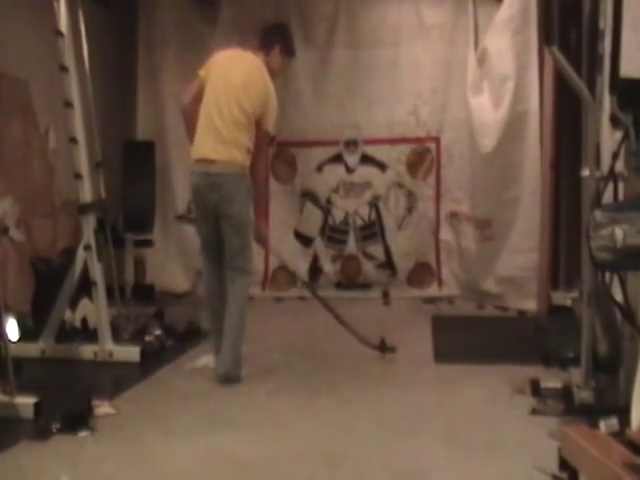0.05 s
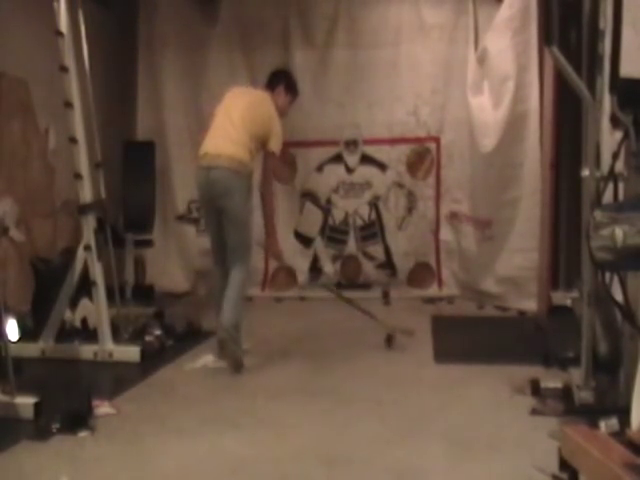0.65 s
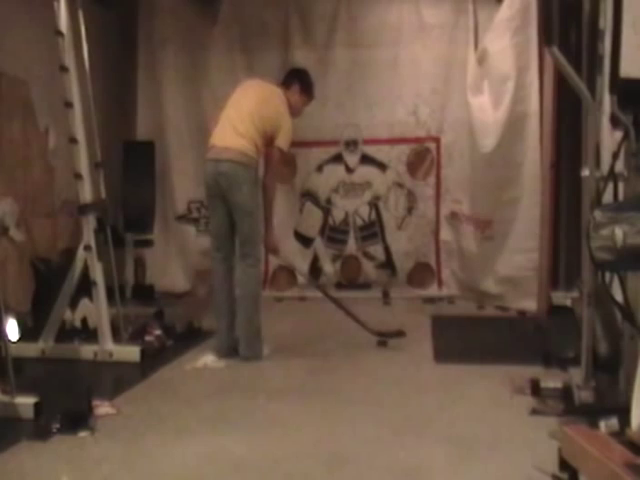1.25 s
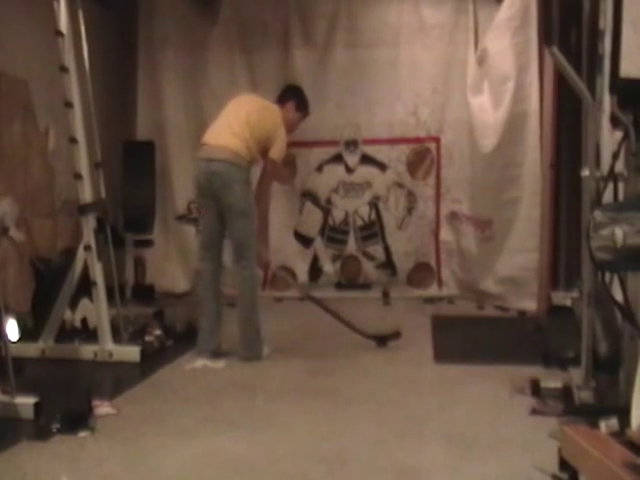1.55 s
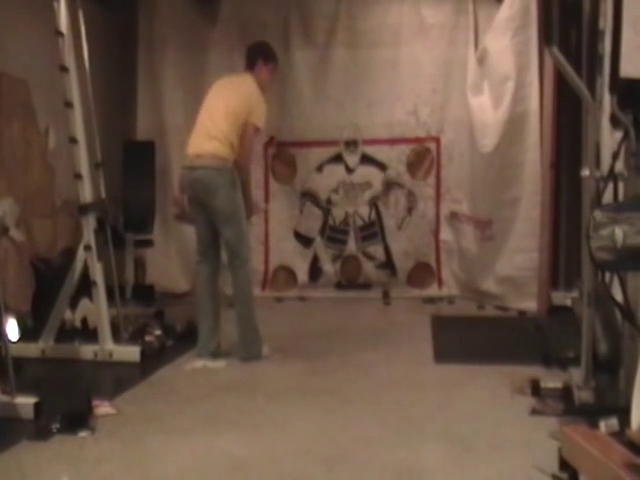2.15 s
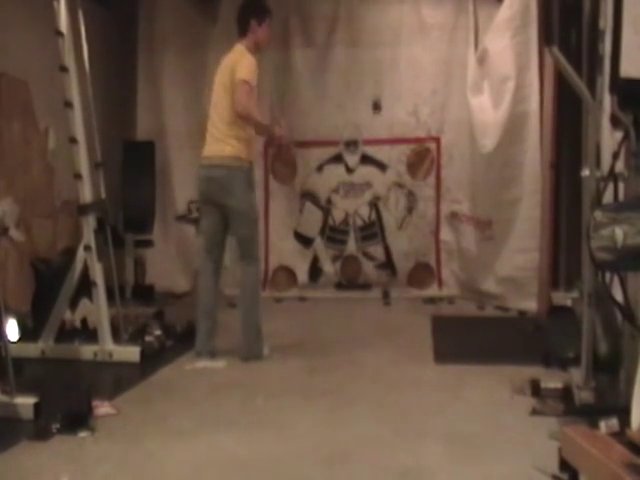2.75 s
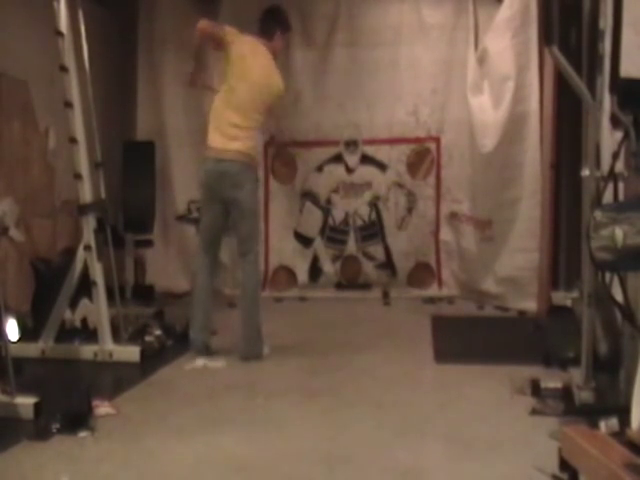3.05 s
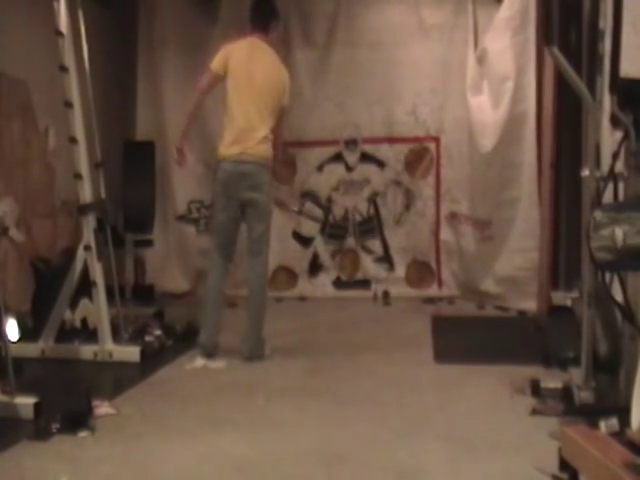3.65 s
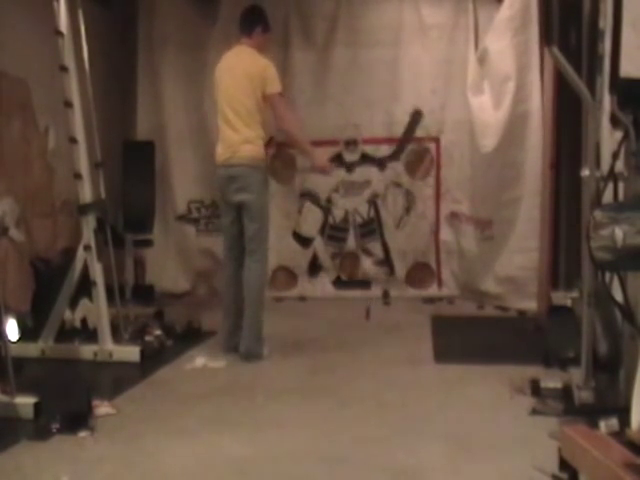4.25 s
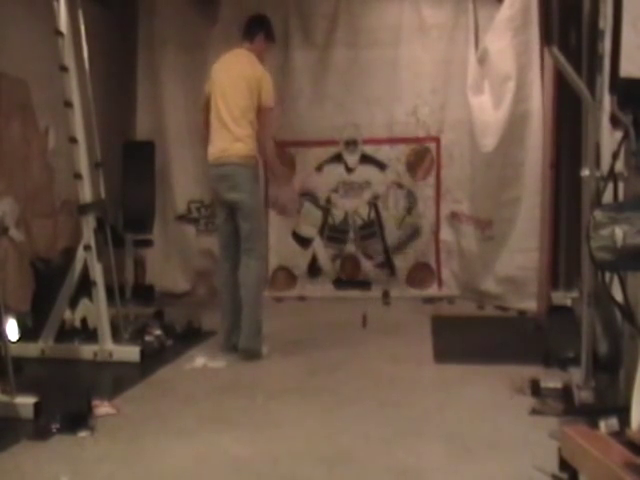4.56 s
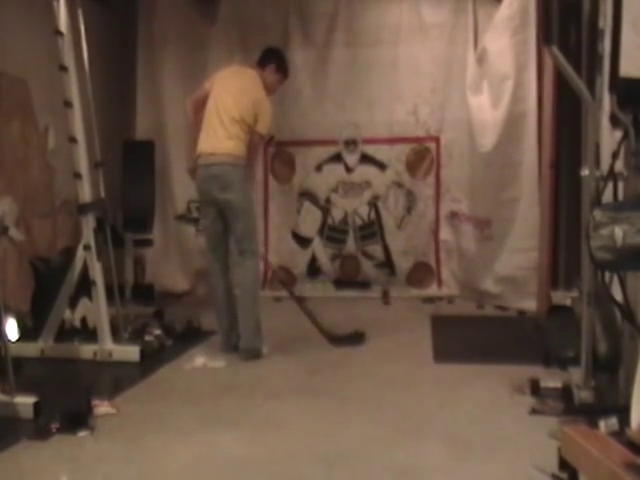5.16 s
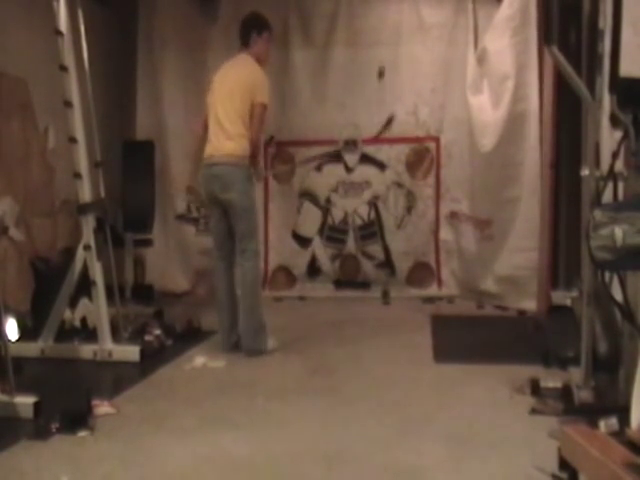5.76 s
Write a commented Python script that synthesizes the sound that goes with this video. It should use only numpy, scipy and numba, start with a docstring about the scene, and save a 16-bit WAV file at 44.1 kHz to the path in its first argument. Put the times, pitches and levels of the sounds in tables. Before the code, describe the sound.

Faint hiss fills a bare basement, with soft swishes of shoes and clothes throughout. From about 0.2 to 0.6 seconds a puck judders and scrapes quietly over gritty concrete. A hockey stick blade clacks on the floor at 0.8 and 1.0 seconds, light thuds follow, and at 1.7 it knocks the puck hard with a short ring. At 3.0 a very loud slap shot cracks. At 3.2 the puck hits a hanging tarp with an equally loud, deep boom; the tarp flaps, and the puck drops and bounces faintly around 3.6. Soft footfalls and a tiny tink come between 4.5 and 4.8. At 5.0 the stick slaps the floor sharply, with lighter taps and dull clacks until 5.3, then quiet shuffling. Each blow echoes for about half a second. The sound is narrow and centered, and the loudest hits slightly overload the microphone.

```python
"""Shoes shuffle over faint hiss and a puck scrapes across concrete: hockey practice in a bare basement.
The stick drags and taps the puck, then fires a slap shot; each blow rings the blade and the room.
The puck booms into a hanging tarp, drops and bounces; soles thud and clothes swish between the blows.
Closely spaced microphones give a narrow image; the loudest cracks clip and turn the gain down."""
import sys
import numpy as np
from scipy import signal
from scipy.fft import rfft, irfft, next_fast_len
from scipy.io import wavfile
from scipy.ndimage import map_coordinates
from numba import njit

SR = 44100
rng = np.random.default_rng(int(sys.argv[2]) if len(sys.argv) > 2 else 0)


def output_pcm(signal):
    """Save a mono or channel-first signal as 16-bit PCM at the path in sys.argv[1].

    Samples are clipped to [-1, 1] before scaling.
    """
    pcm = np.clip(np.atleast_2d(signal).T, -1, 1) * 32767
    wavfile.write(sys.argv[1], SR, np.round(pcm).astype(np.int16))


N = 255780


def amp(db):
    """Decibels to gain."""
    return 10 ** (np.asarray(db) / 20)


def along(points, hz):
    """Interpolate (frequency [Hz], value) points on a log axis."""
    point_hz, values = np.transpose(points)
    return np.interp(np.log(hz + 1), np.log(point_hz + 1), values)


def wobble(knots_per_s):
    """Smooth random curve."""
    knots = rng.standard_normal(int(N * knots_per_s / SR) + 4)
    return map_coordinates(knots, [np.arange(N) * knots_per_s / SR])


def filtered(x, gain_at_hz):
    """Zero-phase filter."""
    size = next_fast_len(N + SR // 2)
    return irfft(rfft(x, size) * gain_at_hz(np.fft.rfftfreq(size, 1 / SR)), size)[..., :N]


def noise(spectrum, grain_db):
    """Mid/side noise of rms 1; grain_db makes single grains stand out."""
    grains = rng.standard_normal((2, N)) * amp(grain_db * rng.standard_normal(N))
    shaped = filtered(grains, lambda hz: amp(along(spectrum, hz)))
    return shaped / np.sqrt(np.mean(shaped ** 2) + 1e-20)


def gesture(peak_s, db, swell_s, fade_s, hold_s=0, sag_db_per_s=0):
    """Gain of a movement: swell, sagging hold, fade. Swell and fade times span 20 dB."""
    t = np.arange(N) / SR - peak_s
    below_db = 20 * (np.maximum(-t, 0) / swell_s + np.maximum(t - hold_s, 0) / fade_s)
    return amp(db - below_db - sag_db_per_s * np.clip(t, 0, hold_s))


def body_impulse(level_db):
    """Causal, unit-energy impulse response of a body with this spectrum."""
    cepstrum = irfft(np.log(amp(level_db)))
    half = len(cepstrum) // 2
    one_sample_delay = np.exp(-1j * np.pi * np.arange(half + 1) / half)
    ring = irfft(np.exp(rfft(2 * cepstrum[1:half], 2 * half) * one_sample_delay))
    return ring[:half] / np.linalg.norm(ring)


# reverberation: (frequency [Hz], T60 [s])
BASEMENT_T60 = [(80, 0.74), (250, 0.44), (600, 0.51), (1500, 0.54), (4000, 0.55), (8000, 0.49),
                (15000, 0.47)]
def basement(direct_db, crack_db, near_db, near_s, t60_scale, build_s=0.0043):
    """Mid/side response: direct sound, a burst off the nearby floor, then the walls' tail builds up."""
    hz, frame_s, bins = signal.stft(rng.standard_normal((2, SR)), SR, nperseg=256)
    t60_s = t60_scale * along(BASEMENT_T60, hz)[:, None]
    tail = signal.istft(bins * amp(-60 * frame_s / t60_s), SR, nperseg=256)[1]
    t = np.arange(tail.shape[1]) / SR
    path = tail * (1 - np.exp(-t / build_s) + amp(near_db) * np.exp(-t / near_s))
    path[0, 0] += amp(direct_db)
    path[0, :3] += amp(crack_db) * np.array([1, 0, -1])  # the direct path keeps its treble
    return path


def blows(events, spectrum, modes, ring_db, treble_hz, crack_db,
          bass_hz=350, ring_q=6, ripple_db=2.5, mode_growth_per_db=0, **room):
    """Each blow rings body and room; the contact tilts the spectrum, its strength can scale the modes."""
    hz = np.fft.rfftfreq(2 ** 14, 1 / SR)

    def bell(centre_hz, width_hz):
        return 1 / (1 + (2 * (hz - centre_hz) / width_hz) ** 2)

    modes_db = sum(lift_db * bell(mode_hz, width_hz) for mode_hz, width_hz, lift_db in modes)
    hardest_db = max(event[1] for event in events)
    bass_shelf = 1 / (1 + (hz / bass_hz) ** 2)
    octaves_up = np.log2(1 + (hz / treble_hz) ** 4) / 4
    out = np.zeros((2, N + 2 * SR))
    for time_s, db, bass_db, treble_db_per_oct, ring_hz in events:
        # the contact point favours one ring and reweights the many small modes
        weights = map_coordinates(rng.standard_normal(SR // 50), [hz / 40])
        ripple = bell(1500, 9000) * weights * (hz > 250)
        contact_db = ring_db * bell(ring_hz, ring_hz / ring_q) + ripple_db * ripple
        tilt_db = bass_db * bass_shelf + treble_db_per_oct * octaves_up
        body_db = along(spectrum, hz) + modes_db * np.exp(mode_growth_per_db * (db - hardest_db))
        ring = body_impulse(body_db + tilt_db + contact_db)
        path = basement(crack_db=crack_db + 3.6 * treble_db_per_oct, **room)  # hard contacts crack more
        heard = signal.fftconvolve(path, ring[None], axes=1)
        out[:, round(time_s * SR):][:, :heard.shape[1]] += amp(db) * heard
    return out[:, :N]


# hiss and rumble: (frequency [Hz], level [dB])
AIR_SPECTRUM = [(15, -49), (25, -9), (117, 3), (223, -1), (531, -6), (754, -8), (1260, -11), (2280, -11.5),
                (3920, -15), (5730, -16), (16000, -28)]
# mains hum and a faint, very high steady tone: (frequency [Hz], rms level [dB])
HUM_TONES = [(120, -70.5), (240, -70.5), (15734, -89)]
def room_tone():
    """Steady hiss and rumble with a faint hum."""
    t = np.arange(N) / SR
    hum = sum(amp(db + 1.4 * wobble(3.3)) * np.sqrt(2) * np.sin(2 * np.pi * hz * t)
              for hz, db in HUM_TONES)
    return amp(-61.5) * noise(AIR_SPECTRUM, grain_db=3) + np.array([hum, np.zeros(N)])


# swishes: (peak time [s], level [dB], swell [s])
SHUFFLES = [(0.06, -60.5, .5), (0.819, -51, 0.4), (1.31, -60, 0.14), (1.509, -53, .1), (2.349, -56, .3),
            (2.51, -51, 0.11), (2.881, -49.5, 0.079), (2.979, -53.5, 0.15), (4.02, -56.5, 0.12),
            (4.621, -57, 0.7), (5.279, -49.5, .15), (5.51, -56.5, 0.044), (5.75, -52.5, .1)]
# rubbing: (frequency [Hz], level [dB])
SWISH_SPECTRUM = [(290, -52.5), (500, -18), (788, -13.5), (1560, -1), (3880, -2), (5950, 0.5), (9510, -7.5),
                  (15000, -25.5)]
def shuffle():
    """Soft swishes of soles, clothes and the sliding blade."""
    swishes = [gesture(peak_s, db, swell_s, fade_s=0.21) for peak_s, db, swell_s in SHUFFLES]
    return np.max(swishes, axis=0) * amp(0.66 * wobble(30)) * noise(SWISH_SPECTRUM, grain_db=0.5)


# puck chatter and grit under the blade: (frequency [Hz], level [dB])
JUDDER_SPECTRUM = [(150, -45), (287, -13), (394, -19), (588, -7), (941, -6.5), (2500, -14.5), (3250, -55),
                   (5500, -120)]
GRIT_SPECTRUM = [(710, -16.5), (1200, -4.5), (1850, -0.5), (2700, -6), (3900, -7.5), (7090, -6),
                 (8700, -12), (15500, -30)]
def drag():
    """The puck judders, then slides; the blade grinds over grit, eases and flicks off with a swish."""
    chatter = gesture(peak_s=0.262, db=-38, swell_s=0.036, fade_s=0.18, hold_s=0.055)
    stroke = gesture(peak_s=0.191, db=-42, swell_s=0.019, fade_s=0.12, hold_s=0.329, sag_db_per_s=7)
    release = gesture(peak_s=0.488, db=-42, swell_s=0.1, fade_s=0.12)
    judder = chatter * amp(1.2 * wobble(70.3)) * noise(JUDDER_SPECTRUM, grain_db=1)
    grit = stroke * amp(1.1 * wobble(50)) * noise(GRIT_SPECTRUM, grain_db=4.5)
    flick = release * noise(SWISH_SPECTRUM, grain_db=2)
    return judder + grit + flick


# floor contacts: (time [s], level [dB], softness [0-1], ring [Hz])
THUDS = [(0.205, -55, 0.3, 110), (0.590, -52, 0.64, 364), (0.832, -48, 0.6, 300), (1.100, -38.3, 0.15, 470),
         (1.398, -48.5, .3, 700), (1.705, -39, .2, 599), (3.604, -46, .25, 873), (4.514, -46.5, 0.8, 300),
         (4.642, -50.5, .65, 337), (4.815, -53, 1, 110), (5.060, -34, .05, 470), (5.155, -37.5, .05, 742)]
# dull contact: (frequency [Hz], level [dB])
THUD_SPECTRUM = [(60, -36), (95, -12), (150, -5), (588, -2), (659, -7), (910, -8.5), (4480, -24),
                 (14000, -45)]
# puck resonances: (frequency [Hz], width [Hz], lift [dB])
PUCK_MODES = [(333, 160, 3.6), (1046, 580, 0.92)]
def floor_thuds(hard_bass_db=-6.5, soft_boost_db=29, soft_treble_db_per_oct=-8.5):
    """Puck and soles thud on the floor; the softer the contact, the deeper and duller."""
    events = [(time_s, db, hard_bass_db + soft_boost_db * soft, soft_treble_db_per_oct * soft, ring_hz)
              for time_s, db, soft, ring_hz in THUDS]
    return blows(events, THUD_SPECTRUM, PUCK_MODES, ring_db=5, treble_hz=1200,
                 direct_db=21, crack_db=4, near_db=-0.5, near_s=0.0042, t60_scale=0.75)


# blade edge on concrete: (time [s], level [dB], bass [dB], treble [dB/oct], ring [Hz])
CLACKS = [(0.240, -41.5, 3, -3, 1900), (0.841, -25, -5, 0, 2500), (0.959, -32, 1.5, -3.5, 3050),
          (5.287, -36.3, 4.5, -9, 1700), (5.299, -33.5, 7, -9, 1100)]
# edge contact: (frequency [Hz], level [dB])
CLACK_SPECTRUM = [(88, -35), (170, -12), (600, -5), (1600, -2), (3000, -2.5), (3700, -7), (5200, -7),
                  (6200, -12.5), (10000, -21.5), (15000, -50)]
# blade resonances: (frequency [Hz], width [Hz], lift [dB])
CLACK_MODES = [(351, 24, 11), (515, 118, 6.4), (1310, 87, 5.8), (2180, 340, 5.5), (2857, 750, 6)]
def blade_clacks():
    """The blade rings as its edge meets the concrete."""
    return blows(CLACKS, CLACK_SPECTRUM, CLACK_MODES,
                 ring_db=3, treble_hz=2900, bass_hz=1130, ripple_db=2.4,
                 direct_db=17.5, crack_db=23.5, near_db=0.5, near_s=0.00099, t60_scale=0.67)


# blade on puck: (time [s], level [dB], bass [dB], treble [dB/oct], ring [Hz])
KNOCKS = [(1.4055, -30, 24, -1.5, 1532), (1.713, -7.5, -1, 2.5, 1760), (1.929, -34, 10, -0.5, 980)]
# rubber contact: (frequency [Hz], level [dB])
KNOCK_SPECTRUM = [(90, -44), (200, -26), (400, -8.5), (800, -7), (1500, 0), (2400, -8), (4600, -10.5),
                  (6800, -19), (8500, -29), (15000, -57)]
# blade resonances: (frequency [Hz], width [Hz], lift [dB])
KNOCK_MODES = [(500, 85, 13), (598, 40, 9.5), (729, 49, 9), (1060, 140, 11.5), (1270, 70, 8.5),
               (1590, 60, 5), (1800, 380, 6), (2013, 50, 5), (2960, 360, 10.5)]
def blade_knocks():
    """The blade knocks the rubber puck; only a hard knock brings out its modes."""
    return blows(KNOCKS, KNOCK_SPECTRUM, KNOCK_MODES,
                 ring_db=4, treble_hz=1503, bass_hz=420, mode_growth_per_db=0.32,
                 direct_db=12, crack_db=18, near_db=1, near_s=0.0036, t60_scale=0.77)


# sharp cracks on floor and puck: (time [s], level [dB], bass [dB], treble [dB/oct], ring [Hz])
SLAPS = [(2.992, -4.5, 1, 3.5, 1320), (2.9945, -4.5, 1, -2.5, 3350), (5.0217, -14.5, -4, -3.5, 5550)]
# hard contact: (frequency [Hz], level [dB])
SLAP_SPECTRUM = [(59, -45), (110, -14), (400, -9.5), (580, -3), (1000, -2), (1900, 0), (3200, -2),
                 (6500, -5.5), (8000, -11), (15000, -39)]
# blade resonances: (frequency [Hz], width [Hz], lift [dB])
SLAP_MODES = [(697, 160, 2.3), (1310, 80, 2), (1780, 130, 3), (2240, 140, 3.4), (2520, 130, 2.4),
              (3680, 200, 2.4), (4500, 300, 3.7), (5560, 170, 4.2)]
def blade_slaps():
    """The blade slaps the floor and strikes the puck, later slaps down again; pressure damps its modes."""
    return blows(SLAPS, SLAP_SPECTRUM, SLAP_MODES,
                 ring_db=3.3, ring_q=6.5, treble_hz=4500, bass_hz=1600, mode_growth_per_db=-0.08,
                 direct_db=20.5, crack_db=27, near_db=8.5, near_s=0.0015, t60_scale=0.82)


# strike, flap and sway: (time [s], level [dB], bass [dB], treble [dB/oct], ring [Hz])
TARP_HITS = [(3.187, -9, -3, 2.5, 1430), (3.194, -14, 1, 6, 205), (3.369, -27.8, -11, -3.5, 560),
             (3.555, -47.5, 34, -9, 88)]
# cloth contact: (frequency [Hz], level [dB])
TARP_SPECTRUM = [(25, -29), (85, -4), (150, -6), (307, -13), (432, -10), (874, -11), (1360, -22.5),
                 (5450, -30), (10000, -40), (15500, -57)]
# tarp resonances: (frequency [Hz], width [Hz], lift [dB])
TARP_MODES = [(85, 16, 6), (220, 40, 5), (340, 100, 7), (540, 50, 4), (890, 40, 4.5)]
def tarp_boom():
    """The puck booms into the hanging tarp, which flaps and sways back."""
    return blows(TARP_HITS, TARP_SPECTRUM, TARP_MODES, ring_db=6, treble_hz=3480,
                 direct_db=24, crack_db=-1, near_db=4, near_s=0.025, t60_scale=0.86)


def tarp_heave(start_s=3.187, db=-4.5, rise_s=0.022, taut_hz=225, slack_hz=76, slacken_s=0.015):
    """The whole tarp swings a few cycles as it catches the puck; pitch sinks as the cloth slackens."""
    t = np.maximum(np.arange(N) / SR - start_s, 0)
    hz = slack_hz + (taut_hz - slack_hz) * np.exp(-t / slacken_s)
    phase = 2 * np.pi * np.cumsum(hz * (t > 0)) / SR
    swing = (t / rise_s * np.exp(1 - t / rise_s)) ** 2
    return np.array([amp(db) * swing * np.sin(phase), np.zeros(N)])


def puck_bounces(landing_s=3.617, landing_db=-37.3, loss_db=8, flight_s=0.142, flight_ratio=0.28):
    """The puck drops from the tarp and bounces, each flight shorter and each contact weaker."""
    bounce = np.arange(3)
    times_s = landing_s + flight_s * (1 - flight_ratio ** bounce) / (1 - flight_ratio)
    levels_db = landing_db - loss_db * bounce
    events = [(time_s, db, 0, 0, 600) for time_s, db in zip(times_s, levels_db)]  # no tilt, 600 Hz ring
    return blows(events, THUD_SPECTRUM, PUCK_MODES, ring_db=4.5, treble_hz=2000,
                 direct_db=16, crack_db=8, near_db=5, near_s=0.016, t60_scale=0.8)


# light touch: (time [s], level [dB], bass [dB], treble [dB/oct], ring [Hz])
TINKS = [(4.694, -49, 0, 0, 1350)]
# narrow resonances: (frequency [Hz], width [Hz], lift [dB])
TINK_MODES = [(1353, 30, 24), (1680, 30, 16)]
def tink():
    """Something light is brushed as the stick is lowered and rings faintly."""
    return blows(TINKS, THUD_SPECTRUM, TINK_MODES, ring_db=2, treble_hz=2000,
                 direct_db=6, crack_db=0, near_db=-6, near_s=0.005, t60_scale=0.58)


def stereo(mid_side, spread):
    """Mid/side to left/right, with a width that depends on frequency."""
    mid = mid_side[0]
    side = filtered(mid_side[1], lambda hz: amp(along(spread, hz)))
    return np.array([mid + side, mid - side])


# stereo width of the action and of the hiss: (frequency [Hz], side gain [dB])
ACTION_SPREAD = [(60, -13.5), (180, -16), (550, -20), (2000, -11.5), (4970, -16.5), (15000, -9.5)]
AIR_SPREAD = [(60, -7), (240, -2), (950, 2.5), (3770, -2.5), (15000, -10.5)]
def scene():
    """The action lies straight ahead, over a wider bed of hiss."""
    stick = blade_knocks() + blade_clacks() + blade_slaps() + tink()
    puck = tarp_boom() + tarp_heave() + puck_bounces() + floor_thuds() + drag()
    action = stereo(stick + puck + shuffle(), ACTION_SPREAD)
    balance = amp([[-0.15], [0.15]])
    return (action + stereo(room_tone(), AIR_SPREAD)) * balance


@njit
def gain_cut_db(over_db, attack_per_sample, release_db_per_sample):
    """The cut rises quickly on peaks over the threshold and relaxes at a steady rate."""
    cut_db, out = 0.0, np.zeros(len(over_db))
    for i in range(len(over_db)):
        rise_db = attack_per_sample * max(over_db[i] - cut_db, 0.0)
        cut_db = max(cut_db + rise_db - release_db_per_sample, 0.0)
        out[i] = cut_db
    return out


def record(dry, threshold_db=-9, attack_s=0.005, release_db_per_s=90, low_cut_hz=52, top_hz=16300):
    """Gain control, clipping of what gets past it, low cut and band limit."""
    over_db = 20 * np.log10(np.abs(dry).max(axis=0) + 1e-9) - threshold_db
    held = dry * amp(-gain_cut_db(over_db, 1 / (attack_s * SR), release_db_per_s / SR))
    clipped = np.clip(held, -0.85, 0.85)
    low_cut = signal.butter(2, low_cut_hz, "highpass", fs=SR, output="sos")
    return filtered(signal.sosfilt(low_cut, clipped), lambda hz: hz < top_hz)


dry = scene()
out = record(dry)
output_pcm(out)
```